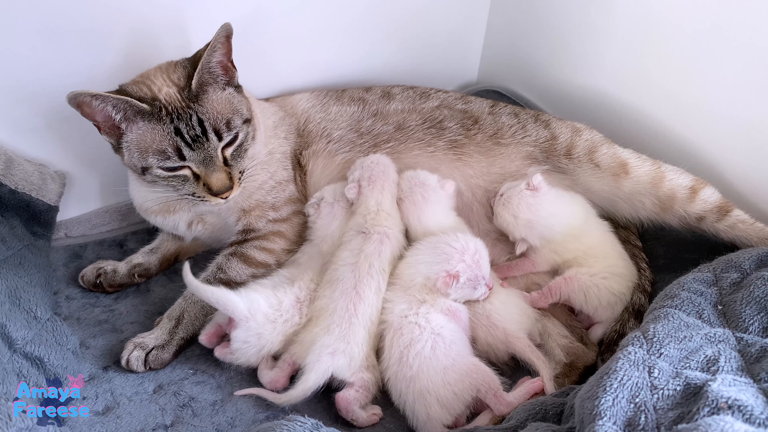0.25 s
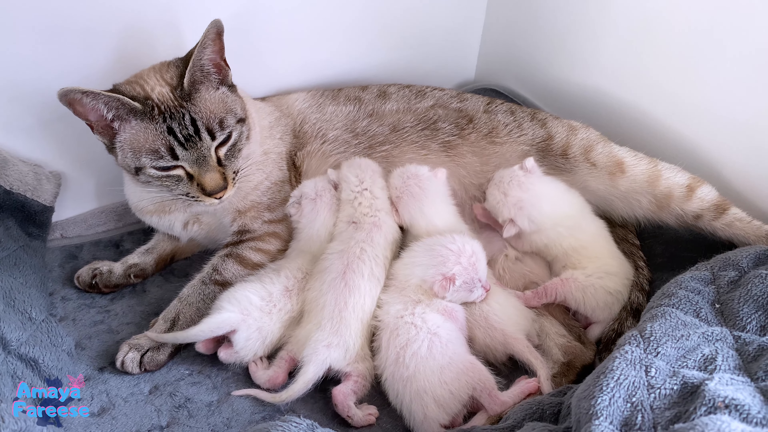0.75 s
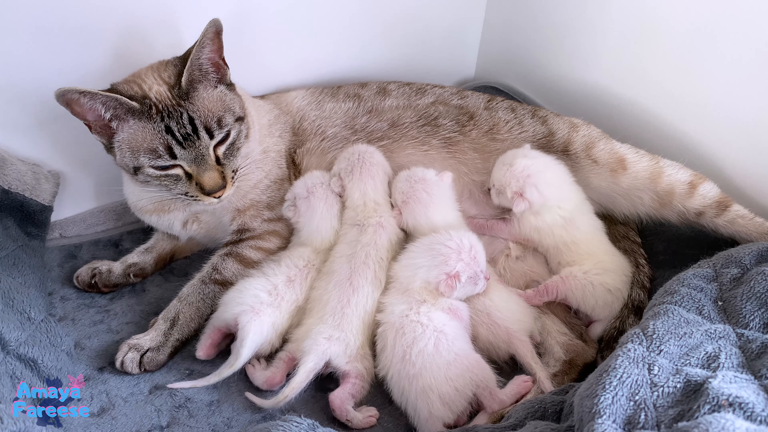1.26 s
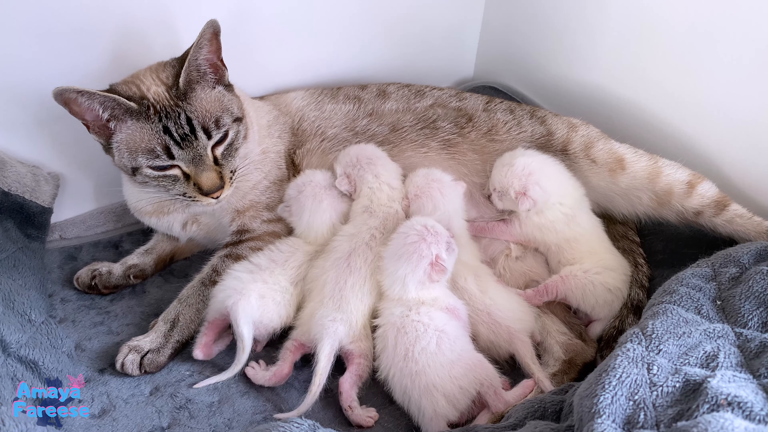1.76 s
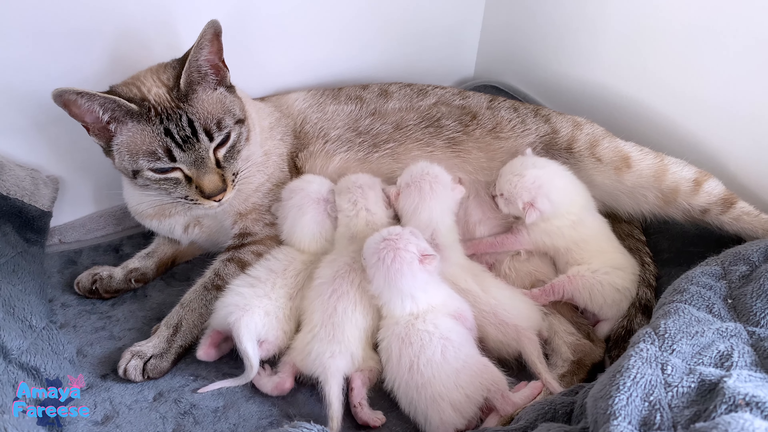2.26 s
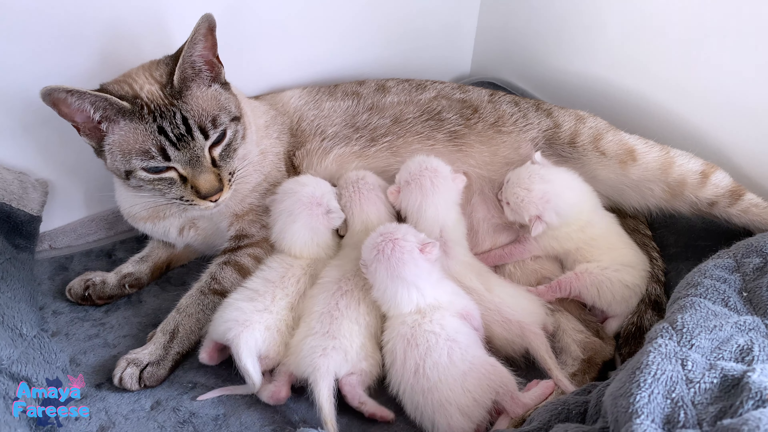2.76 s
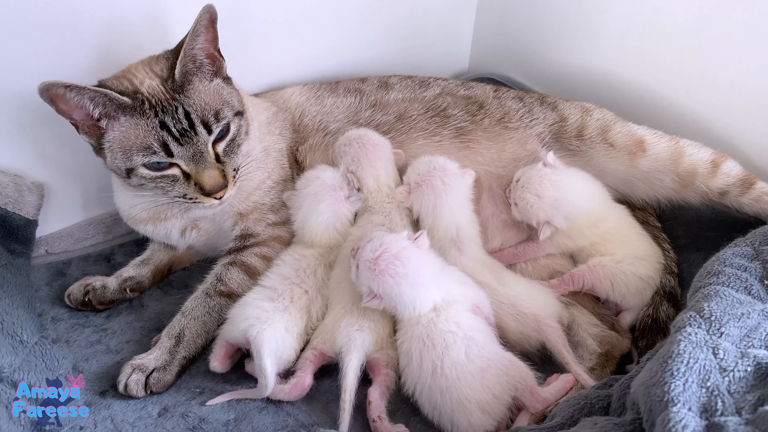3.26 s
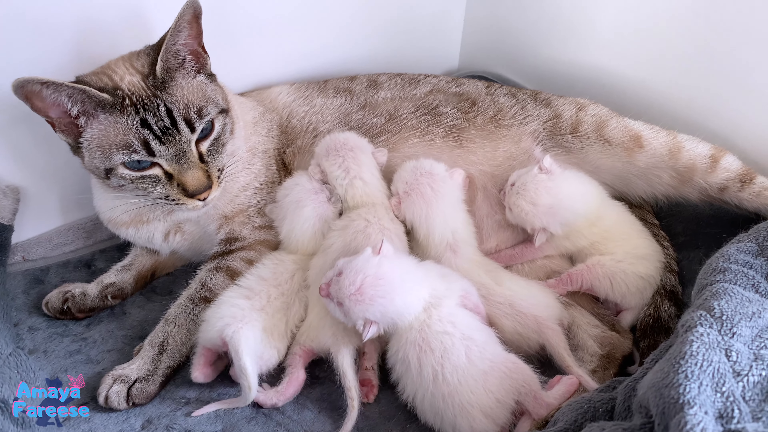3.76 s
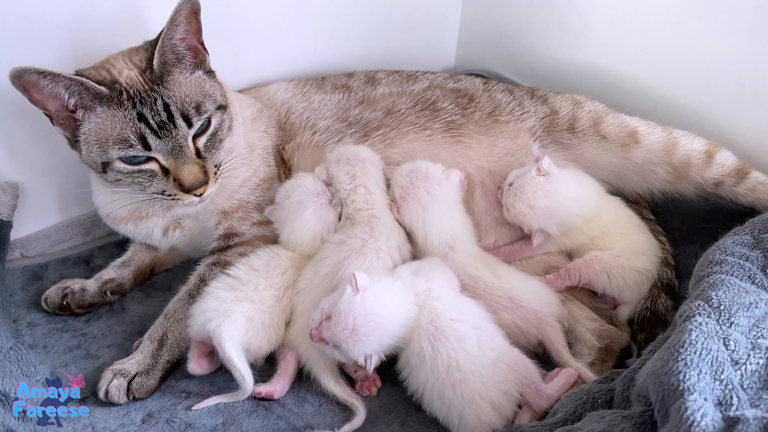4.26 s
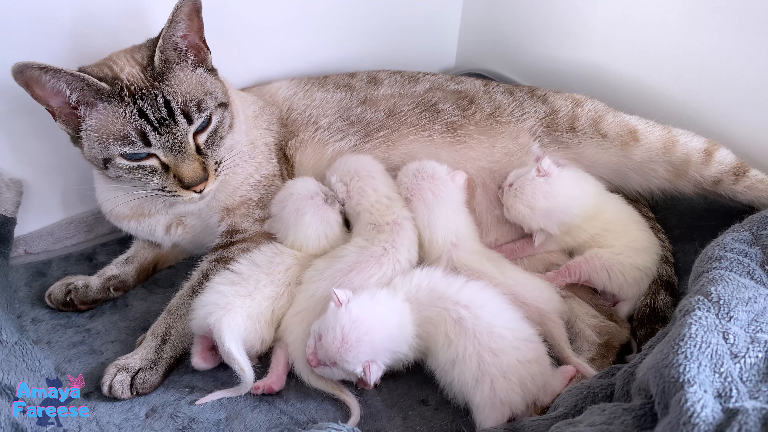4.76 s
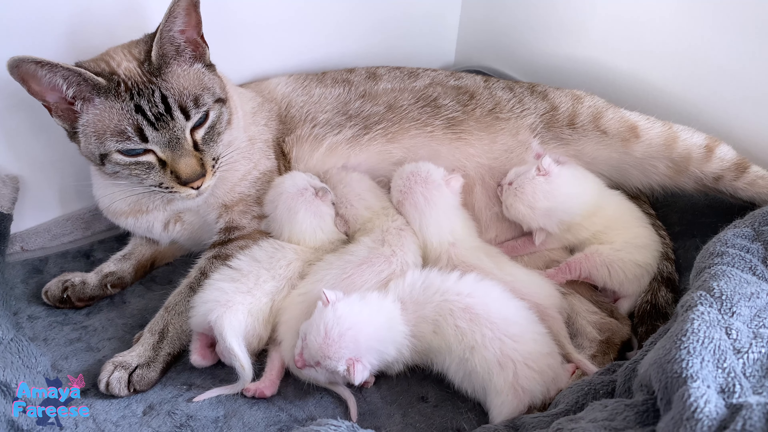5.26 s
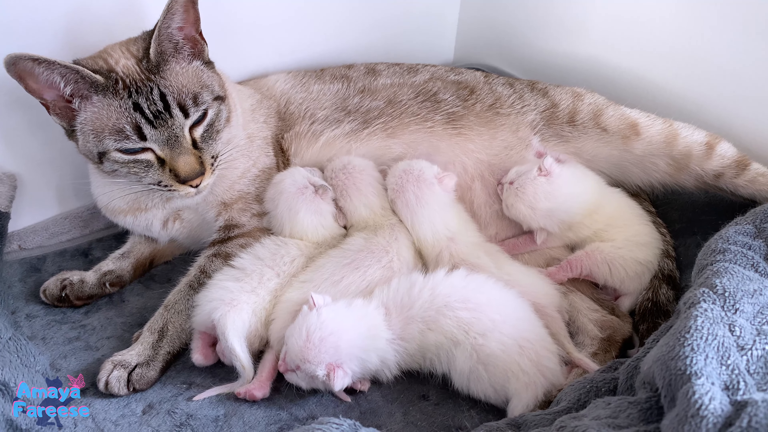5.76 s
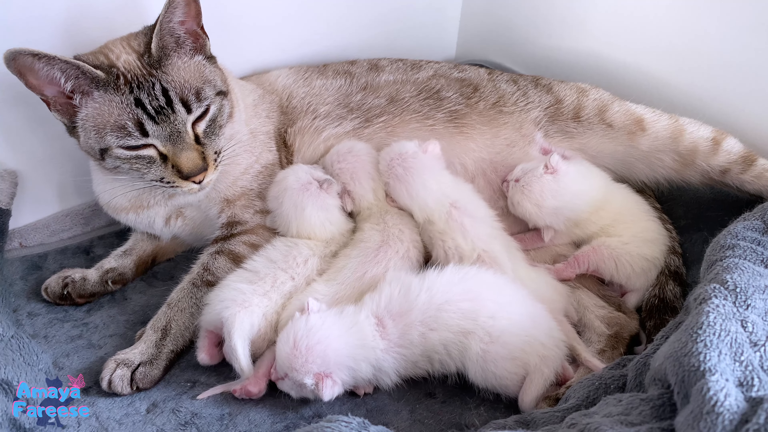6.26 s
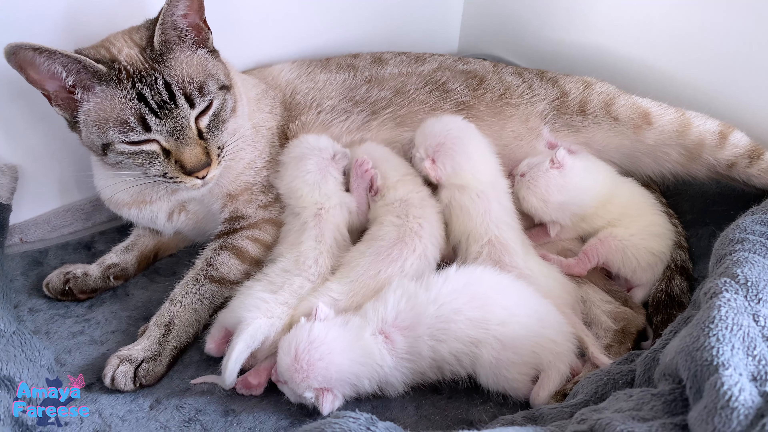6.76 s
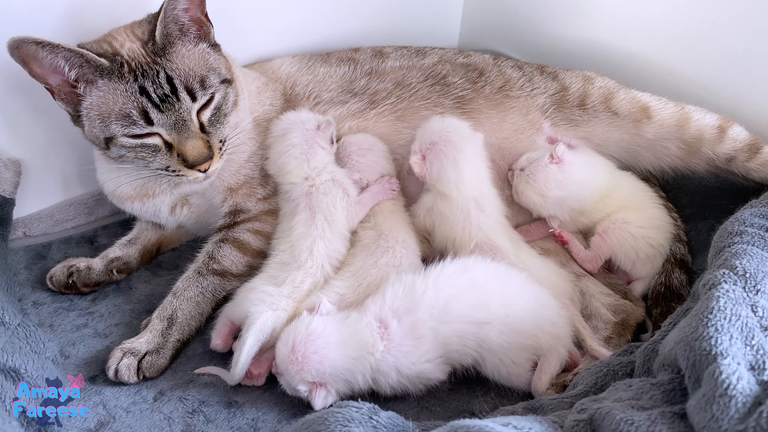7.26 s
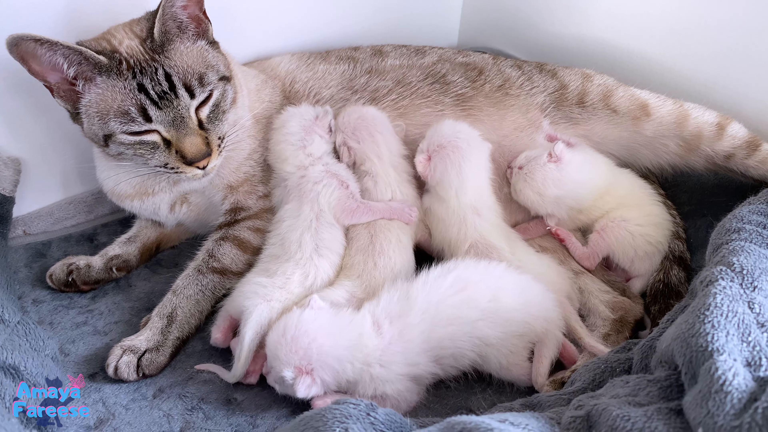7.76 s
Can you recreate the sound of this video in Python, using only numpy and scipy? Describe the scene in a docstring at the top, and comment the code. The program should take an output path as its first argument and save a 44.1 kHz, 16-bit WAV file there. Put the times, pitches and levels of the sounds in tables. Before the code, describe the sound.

Close, deep cat purr in alternating strong and soft strokes, over quiet room hiss, with tiny squeaks, rustling fur and soft suckling smacks.

```python
"""A mother cat purrs close to the microphone while her kittens nurse on a blanket in a quiet room.
From the start her larynx snaps about 24 times a second, ringing her chest: hard going in, softer going out.
Hiss, low rumble and rustling fur lie under it; slides, low flutter at the turn of the purr and thuds join.
Wet noise-burst clicks and tiny squeaks of her wet nose, many in step with the purr, are scattered after.
At 5.57 s band-shaped noise whistles once in her nose, then most of the kittens' ringing smacks follow."""
import sys
import numpy as np
from scipy import signal
from scipy.fft import rfft, irfft
from scipy.io import wavfile
from scipy.ndimage import uniform_filter1d

SR = 44100
rng = np.random.default_rng(int(sys.argv[2]) if len(sys.argv) > 2 else 0)


def dump(signal):
    """Clip the signal to [-1, 1] and save it as 16-bit WAV at the path in sys.argv[1]."""
    limited = np.clip(np.atleast_2d(signal).T, -1, 1)
    pcm = np.round(limited * 32767).astype(np.int16)
    wavfile.write(sys.argv[1], SR, pcm)


N = 353241
SIZE = 8192  # samples in one short sound
HZ = np.fft.rfftfreq(SIZE, 1 / SR)
EDGE_HZ = 16000

# purr strokes: start_s, end_s, level_db, hardness_db (at its peak), hardest_share (of the stroke),
# then rate_hz of the flutter at five evenly spaced moments
INHALES = [(0.5835, 1.324, -31.5, 1.5, 0.31, 23.65, 23.31, 23.51, 24.04, 23.4),
           (2.1381, 2.868, -30.5, 1.3, 0.51, 23.41, 24.28, 24.25, 23.05, 25.23),
           (3.6701, 4.396, -30, 0.6, 0.37, 23.6, 23.57, 23.71, 25.17, 25.15),
           (5.2402, 5.941, -29.5, 2.6, 0.38, 23.41, 22.82, 23.45, 24.48, 24),
           (6.7233, 7.337, -30, 3.1, 0.4, 24.2, 22.9, 23.15, 24.06, 24.1)]
EXHALES = [(-0.0137, 0.479, -36.5, 1.5, 0.25, 25.62, 25.01, 25.44, 26.13, 24.33),
           (1.3447, 2.037, -36, 1.2, 0.63, 25.66, 25.39, 25.13, 25.66, 24.38),
           (2.892, 3.59, -35, 2.7, .45, 24.45, 25.24, 24.39, 25.37, 25.37),
           (4.4152, 5.173, -35.5, 5.7, 0.36, 25.05, 26.56, 25.76, 25.53, 24.18),
           (6.0002, 6.658, -34, 6.9, .5, 24.51, 25.88, 24.7, 24.97, 24.67),
           (7.4017, 7.992, -34, 7.7, 1, 23.77, 24.55, 23.94, 25.2, 25.33)]
# the first snaps of a stroke are weaker and softer, the last die away as the flow turns round
ATTACK_S, ATTACK_DB, ATTACK_SOFT_DB = 0.0069, 3, 3.5
RELEASE_S, RELEASE_DB = 0.029, 7
# moments when snaps rasp more, or less, than their neighbours: middle_s, extra_hardness_db
CATCHES = [(.669, 1), (.755, 4.5), (.882, 4), (.925, 4.5), (.967, 3), (2.43, 3), (2.514, 1.5), (2.681, 4.5),
           (3.925, 3), (3.967, 2.5), (4.053, 2.5), (4.094, 2.5), (4.136, -4), (4.177, 1.5), (5.628, 2.8),
           (5.671, -8), (5.712, 3), (6.895, 4), (7.068, -1.5), (7.109, 2.5), (7.193, 2)]
CATCH_S = 0.015
CATCH_LEVEL_SHARE = 0.3  # such a snap is a little louder or softer too
# shape of the ring of her chest on each stroke: frequency_hz, level_db
CHEST_RING_IN = [(20.0, -84), (50.0, -70), (72.0, -49), (90.0, -6.5), (110.0, -8.5), (132.0, 0),
                 (160.0, -7.5), (195.0, -8.5), (260.0, -19), (480.0, -33.5), (590.0, -45.5),
                 (1200.0, -78.5), (3000.0, -106.5)]
CHEST_RING_OUT = [(20.0, -59.5), (50.0, -62.5), (72.0, -32), (90.0, -4.5), (110.0, -12), (132.0, -6),
                  (160.0, -10.5), (195.0, -17.5), (260.0, -27.5), (400.0, -45.5), (600.0, -56.5),
                  (1200.0, -79), (3000.0, -99.2)]
# shape of the crisp edge of a snap, throat narrow and throat open: frequency_hz, level_db
THROAT_NARROW = [(60, -52.5), (250, -1.5), (400, 0.5), (480, 8), (545, 9.5), (610, -16), (700, -2),
                 (780, -7.5), (950, -7.5), (1200, -20.5), (1600, -24), (2000, -31), (4000, -57),
                 (12000, -97.5)]
THROAT_OPEN = [(60, -50.5), (250, -7.5), (400, 0), (490, 1.5), (560, -4), (650, 6), (850, -2.5),
               (1150, -15), (1450, -21.5), (1900, -33), (4000, -54), (12000, -90.5)]
# her throat relaxes after the second breath in and muffles the last: time_s, open_share, upper_rasp_db
THROAT_OPENING = [(1.3, 0.058, -1.5), (2.1, 0.05, 1), (2.9, 0.05, 7), (3.6, 0.94, 1), (5.9, 1, -3),
                  (6.7, 1, -4.5)]
# the left port faces her throat: frequency_hz, left_minus_right_db
FACING = [(130, 2), (250, 2.5), (370, 3.5), (520, 10), (680, 7), (1000, 10.5), (2000, 2)]
# loose tissue flapping in the throat: frequency_hz, level_db
GURGLE_COLOUR = [(100, -26.5), (190, 1), (330, 2.5), (470, -2.5), (600, -20), (1500, -44.5), (5000, -73)]
GURGLE_S = 0.011
# decay time of the room, to -60 dB: frequency_hz, t60_s
ROOM_T60 = [(100, 0.89), (400, 0.49), (1500, 0.037), (8000, 0.13)]
# shapes of the quiet hiss of the room and of the low rumble: frequency_hz, level_db
AIR_COLOUR = [(410, -26), (700, 0), (841, -1.5), (2020, -7.5), (2200, -7.5), (2350, -5.5), (2550, -10.5),
              (2800, -7.5), (3070, -11), (4990, -9.5), (5470, -12), (6650, -11), (9230, -23),
              (10500, -19.5), (11700, -24), (12300, -33), (13300, -45.5), (16000, -44)]
RUMBLE_COLOUR = [(15, -40), (30, -16.5), (45, -3), (65, 2), (100, -11), (200, -1.5), (400, -23.5),
                 (700, -34.5), (1200, -50), (3000, -66.5)]
# fur brushes past fur: middle_s, length_s, level_db (before the trim in fur)
BRUSHES = [(.21, 0.27, -80), (.77, 0.17, -78), (1.2, 0.22, -91), (1.44, 0.092, -84), (2.3, 0.22, -82),
           (3.07, 0.4, -77), (3.47, 0.66, -76.5), (3.93, 0.67, -80), (4.59, 0.3, -79.5), (4.92, 0.29, -79),
           (5.51, .26, -78), (5.88, 0.24, -80), (6.36, 0.66, -85), (6.66, 0.2, -79), (7.18, 0.26, -83),
           (7.43, .16, -81), (7.66, 0.58, -80), (7.96, .25, -79)]
FUR_REST_DB = -84  # the litter is never quite still
# shape of the rustle: frequency_hz, level_db
FUR_COLOUR = [(600, -14), (2000, -7.5), (2900, -0.5), (4000, -19), (7000, 5), (8300, 8), (9500, 0),
              (12000, -1), (13000, -13), (16000, -17.5)]
# kittens slide over the blanket: middle_s, length_s, level_db
SLIDES = [(.23, .2, -71), (.41, .14, -72), (1.8, 0.15, -69), (5.57, 0.68, -64), (5.9, 0.14, -74),
          (6.4, 0.61, -82)]
# low, dull flutter of the purr as the flow turns, and a few soft thuds: start_s, peak_db, pitch_hz
LOW_PULSES = [(0.457, -30, 81), (0.462, -48, 52), (0.497, -35, 77), (0.518, -32.5, 72), (.545, -49, 70),
              (.795, -42, 50), (6.219, -48, 57)]
# the larynx stutters weakly while the flow turns round: start_s, end_s, level_db
TURNS = [(.49, .57, -48.5), (2.05, 2.11, -43.5), (2.87, 2.885, -72), (3.6, 3.64, -53), (5.175, 5.21, -49),
         (5.95, 5.99, -47.5), (6.66, 6.71, -46.5), (7.36, 7.39, -46)]
STUTTER_S = 0.028  # typical gap between these weak snaps
# wet mouth clicks: start_s, level_db (before the trim in clicks), treble_db (before tilt_share),
# left_minus_right_db, top_edge_hz, decay_s
CLICKS = [(1.4344, -58, -2, 3, 12000, .003), (3.667, -38.5, 1, -1, 13600, 0.0026),
          (3.683, -42.5, 0, -4, 14000, .003), (4.6034, -52, 19, -4, 9000, 0.0043),
          (6.3987, -46, 15, -4, 7960, .0035), (6.58, -42, 1, -1, 6540, 0.0027),
          (7.2168, -43.5, -4, -5, 9000, 0.0032), (7.4126, -54, 7, 0, 8000, .0035),
          (7.639, -35, 2.5, -4, 13000, .0025), (7.641, -34, 8, 4, 6500, 0.0025),
          (7.648, -31, 9, -4, 16000, .0016), (7.652, -35, -2, -1, 16000, 0.0014),
          (7.6583, -34, 2, 3, 16000, 0.0015), (7.6745, -30, 11, -1, 16000, .0016),
          (7.919, -44, 1, 3, 12000, 0.0026)]
# shape of a click before its tilt and top edge: frequency_hz, level_db
CLICK_COLOUR = [(150, -36), (450, -21), (900, -1), (1600, 2), (2500, 5), (3800, -4.5), (5200, -0.5),
                (7800, -2), (9500, -7.5), (11500, -6), (13000, -9), (15000, 4)]
# tiny squeaks of the mother's wet nose, many in step with her purr:
# start_s, level_db (before the trim in squeaks), pitch_hz
SQUEAKS = [(3.1243, -62, 2780), (3.6677, -63, 2750), (3.677, -61, 2750), (3.687, -57.5, 2830),
           (4.753, -61.5, 2900), (5.43, -60.5, 3020), (6.032, -66, 2850), (6.0711, -62.5, 2840),
           (6.1095, -59.5, 2830), (6.15, -66, 2820), (6.1878, -56.5, 2830), (6.2692, -59.5, 2900),
           (6.308, -68, 2900), (6.5375, -66, 2900), (7.6395, -56, 2780), (7.68, -59, 2820)]
# air whistles through her nose at the crest of the loudest inhale: middle_s, length_s, level_db
WHISTLES = [(5.572, 0.09, -64)]
# shape of that whistle: frequency_hz, level_db
WHISTLE_COLOUR = [(1000, -43), (1450, -18), (1545, 8), (1640, -20), (1900, -26), (2030, -13), (2150, -22),
                  (2400, -14), (2700, -35), (6000, -60)]
# soft smacks of suckling: start_s, level_db (before the trim in smacks), pitch_hz, ring_t60_s
SMACKS = [(3.668, -55.5, 1100, .02), (5.852, -54, 565, .025), (5.887, -53, 610, .025),
          (5.907, -46.5, 640, .035), (6.002, -56, 740, .025), (6.133, -58, 695, .025),
          (6.267, -54, 672, .025), (6.336, -48.5, 655, .045), (6.507, -57, 589, .025),
          (6.5375, -48, 620, 0.033), (6.602, -47, 524, .03), (6.663, -59, 703, .025)]


def amp(db):
    """Decibels to gain."""
    return 10 ** (np.asarray(db) / 20)


def evened(x):
    """Scales to an rms of one."""
    return x / np.sqrt(np.mean(x ** 2) + 1e-24)


def read(points, hz):
    """Reads a spectrum on a log-frequency axis."""
    f, value = np.transpose(points)
    return np.interp(np.log(hz + 1), np.log(f + 1), value)


def add(mix, s, sound):
    """Mixes a sound in at time s, trimming whatever falls outside."""
    at = round(s * SR)
    sound = sound[..., max(-at, 0):]
    part = mix[..., max(at, 0):][..., :sound.shape[-1]]
    part += sound[..., :part.shape[-1]]


def canvas():
    """An empty stereo mix and the time axis of one short sound."""
    return np.zeros((2, N)), np.arange(SIZE) / SR


def pan(left_db):
    """Left and right gains for a level difference."""
    return amp(np.array([[left_db], [-left_db]]) / 2)


def noise(colour, size, channels=2):
    """Independent channels of noise with a given spectrum, at an overall rms of one."""
    white = rfft(rng.standard_normal((channels, size)))
    gain = amp(read(colour, np.fft.rfftfreq(size, 1 / SR)))
    return evened(irfft(white * gain, size))


def swells(moves):
    """Gain over time of movements that each swell and fade smoothly."""
    level = np.zeros(N)
    for middle, length, db in moves:
        add(level, middle - length / 2, amp(db) * signal.windows.hann(int(length * SR)))
    return level


def causal(db):
    """Frequency response with this gain that rings only after it is struck."""
    mirrored = np.r_[db, db[-2:0:-1]]
    log_gain = np.log(amp(np.maximum(mirrored, -110)))
    return np.exp(np.conj(signal.hilbert(log_gain)))[:len(db)]


def ripple(count=30):
    """Random smooth unevenness of a spectrum, with a spread near one."""
    return read(np.c_[np.geomspace(40, 4000, count), rng.standard_normal(count)], HZ)


def effort(at, stroke, crest, arch_db, soften_db):
    """Level and hardness (dB) of a snap: each bends over the stroke, the level about the share `crest`."""
    start, end, level_db, hard_db, hardest = stroke[:5]
    share = (at - start) / (end - start)
    starting = np.exp((start - at) / ATTACK_S)
    ending = np.exp((at - end) / RELEASE_S)
    catch_db = sum(db * np.exp(-((at - s) / CATCH_S) ** 2) for s, db in CATCHES)

    level_db = level_db + CATCH_LEVEL_SHARE * catch_db - arch_db * (2 * (share - crest)) ** 2
    level_db = level_db - ATTACK_DB * starting - RELEASE_DB * ending
    hard_db = hard_db + catch_db - ATTACK_SOFT_DB * starting - soften_db * (2 * (share - hardest)) ** 2
    return level_db, hard_db


def snaps(strokes, **shape):
    """The larynx snaps each time its flutter completes a cycle; rows (time_s, level_db, hardness_db)."""
    rows = []
    for stroke in strokes:
        start, end, _, _, _, *rates = stroke
        t = np.arange(start, end, 1 / SR)
        rate_hz = np.interp(t, np.linspace(start, end, len(rates)), rates)
        turns = np.cumsum(rate_hz) / SR
        at = np.interp(np.arange(int(turns[-1]) + 1), turns, t)
        rows.extend(zip(at, *effort(at, stroke, **shape)))
    return rows


def struck(colour_db, spread_hz, right_lag_s, cycle_s=0.03, order=3):
    """The ring of one snap at both ports; the lows come late, so each thump falls in pitch."""
    late_lows = ((spread_hz - 1j * HZ) / (spread_hz + 1j * HZ)) ** order
    response = causal(colour_db) * late_lows
    lean = amp(read(FACING, HZ) / 2)
    lag = np.exp(-2j * np.pi * HZ * right_lag_s)
    ring = irfft([response * lean, response / lean * lag])
    # before the lean, an rms of one if spread over one cycle
    return ring * np.sqrt(cycle_s * SR / np.sum(irfft(response) ** 2))


def purr(cycles, chest, spread_hz, delay_s, snap_share, jitter_s, uneven_db, fickle_db, ripple_db, tick_db,
         tick_share, reopen_s, reopen_jitter_s, reopen_db, retick_db, puff_db):
    """Each cycle the folds snap (thump and tick), part again with a softer thump and let a puff through."""
    out, t = canvas()
    edge = read([(170, 0.051), (480, 1.05)], HZ)  # a harder snap lifts the upper part of the ring
    rasp = read([(480, 0.4), (900, 0.94)], HZ)  # and brightens the tick
    upper = read([(700, 0), (1100, 1)], HZ)
    puff_colour = [(150, -18.5), (420, 0.5), (580, -6.5), (900, -18.5), (1400, -15.0), (2200, -30.0),
                   (5000, -42.5)]
    moments, openings, rasps_db = np.transpose(THROAT_OPENING)
    for at, level_db, hard_db in cycles:
        late, strong, sharp, again, when = rng.standard_normal(5)
        size = amp(level_db + uneven_db * strong)
        hard_db = hard_db + fickle_db * sharp

        chest_db = read(chest, HZ) + snap_share * hard_db * edge + ripple_db * ripple()
        thump = struck(chest_db, spread_hz, right_lag_s=0.00044)

        opened = np.clip(np.interp(at, moments, openings), 0, 1)
        throat_db = (1 - opened) * read(THROAT_NARROW, HZ) + opened * read(THROAT_OPEN, HZ)
        throat_db = throat_db + np.interp(at, moments, rasps_db) * upper
        tick = struck(throat_db + 2.9 * ripple(), spread_hz, right_lag_s=0.00071)
        tick = irfft(rfft(tick) * causal(tick_db + tick_share * hard_db * rasp))

        puff = noise(puff_colour, SIZE) * np.exp(-t / 0.024) * (1 - np.exp(-t / 0.00073))
        puff = puff * amp(puff_db + 0.55 * hard_db)

        at += delay_s + jitter_s * late
        add(out, at, size * (thump + tick + puff * pan(3.3)))
        # the second tick is softer going in, louder going out
        parting = amp(reopen_db + 2.2 * again) * thump + amp(retick_db + 3.7 * again) * tick
        add(out, at + reopen_s + reopen_jitter_s * when, size * parting)
    return out


def gurgle(cycles, gain_db=-21.0, uneven_db=2, lead_s=0.00395, scatter_s=0.002):
    """On the way out the slack throat flaps roughly around each snap: a short burst of noise."""
    out, window = np.zeros((2, N)), signal.windows.hann(int(GURGLE_S * SR))
    for at, level_db, _ in cycles:
        when, strong = rng.standard_normal(2)
        flap = noise(GURGLE_COLOUR, SIZE, channels=1)[:, :len(window)] * window
        gain = amp(level_db + gain_db + uneven_db * strong)
        add(out, at - lead_s + scatter_s * when, gain * pan(4.1) * flap)
    return out


def room(x, wet):
    """Adds a short, soft tail from the nearby walls: decaying noise, different at each port."""
    hz, t, z = signal.stft(rng.standard_normal((2, SIZE * 2)), SR, nperseg=256)
    decay = amp(-60 * t / read(ROOM_T60, hz)[:, None])
    tail = signal.istft(z * decay, SR, nperseg=256)[1][:, :SIZE]
    tail[:, :SR // 250] = 0  # nothing returns in the first 4 ms
    tail = irfft(rfft(tail / np.linalg.norm(tail[0])) * causal(read(wet, HZ)))
    return x + signal.fftconvolve(x, tail, axes=1)[:, :N]


def floor(hiss_db=-68, rumble_db=-53, apart_db=-5):
    """Steady hiss, different at each port, over a low rumble that is mostly shared."""
    hiss = amp(hiss_db) * noise(AIR_COLOUR, N) * pan(0.83)
    rumble = noise(RUMBLE_COLOUR, N, channels=1) + amp(apart_db) * noise(RUMBLE_COLOUR, N)
    return hiss + amp(rumble_db) * rumble


def fur(gain_db=-1.0, grain_db=2):
    """Fur brushes fur and blanket in fine grains: noise with a quickly wavering level."""
    level = amp(FUR_REST_DB) + amp(gain_db) * swells(BRUSHES)
    grains = evened(uniform_filter1d(rng.standard_normal(N), size=100))
    return level * amp(grain_db * grains) * noise(FUR_COLOUR, N) * pan(-2.6)


def slides():
    """A kitten's body drags over the cloth with a dull brush of noise."""
    colour = [(200, -7), (800, 4.5), (1500, -2.0), (2500, -5.0), (3300, -13.0), (5000, -9.0), (10000, -41)]
    return swells(SLIDES) * noise(colour, N) * pan(3.4)


def low_pulses(rise_s=0.012):
    """Low, dull flutter of the purr as the flow turns, and a few soft thuds: brief sine pulses."""
    out, t = canvas()
    pulse = (t / rise_s * np.exp(1 - t / rise_s)) ** 2
    for s, db, hz in LOW_PULSES:
        add(out, s, amp(db) * pan(1.5) * np.sin(2 * np.pi * hz * t) * pulse)
    return out


def stutters():
    """Weak, irregular snaps as the flow turns round; rows (time_s, level_db, hardness_db)."""
    rows = []
    for start, end, db in TURNS:
        gaps = STUTTER_S * rng.uniform(0.77, 1.3, size=6)
        times = start + np.cumsum(gaps) - gaps[0]
        rows.extend((at, db, 0) for at in times if at < end)
    return rows


def clicks(gain_db=-7, rise_s=0.00053, tilt_share=0.72, steep_db=40):
    """Wet lips part with a tiny crack: a noise burst, tilted and cut off by steep_db an octave."""
    out, t = canvas()
    for s, db, treble_db, left_db, top_hz, decay_s in CLICKS:
        colour = []
        for f, d in CLICK_COLOUR:
            tilt_db = tilt_share * treble_db * np.log(f / 4000)
            cut_db = steep_db * max(np.log2(f / top_hz), 0)
            colour.append((f, d + tilt_db - cut_db))
        burst = noise(colour, SIZE) * (1 - np.exp(-t / rise_s)) * np.exp(-t / decay_s)
        add(out, s, amp(db + gain_db) * pan(left_db) * burst)
    return out


def faint_squeaks(start, end, db, hz, count):
    """Many faint squeaks at chance moments, as rows (start_s, level_db, pitch_hz)."""
    when, size, pitch = rng.random((count, 3)).T
    return np.c_[start + (end - start) * when, db - 8 * size, hz * (0.92 + 0.16 * pitch)]


def squeaks(gain_db=-3, rise_s=0.0015, fall=0.036, rough=0.6, flutter_hz=400):
    """A tiny gap in her wet nose whistles, roughened by noise and sagging in pitch as it opens."""
    out, t = canvas()
    flutter_colour = [(flutter_hz / 2, 0), (flutter_hz, -6), (flutter_hz * 4, -40), (flutter_hz * 10, -80)]
    swell = t / rise_s * np.exp(1 - t / rise_s)
    for s, db, hz in np.r_[SQUEAKS, faint_squeaks(2.5, 8, db=-70, hz=2850, count=30)]:
        pitch_hz = hz * (1 + fall * (np.exp(-t / (2 * rise_s)) - 0.5))
        turn = np.exp(2j * np.pi * np.cumsum(pitch_hz) / SR)
        flutter = noise(flutter_colour, SIZE)
        add(out, s, amp(db + gain_db) * (turn.imag + rough * flutter * turn.real) * swell)
    return out


def smacks(gain_db=2.0, rise_s=0.0005, puff_db=-6, puff_s=0.012):
    """Lips let go of the teat: the hollow of the mouth rings briefly, with a little puff."""
    out, t = canvas()
    for s, db, hz, t60 in SMACKS:
        ring = np.sin(2 * np.pi * hz * t) * np.exp(-np.log(1000) * t / t60)
        colour = [(hz / 8, -20), (hz * 0.7, -2), (hz * 1.1, 0), (hz * 0.87, -13), (hz * 12, -45)]
        puff = amp(puff_db) * noise(colour, SIZE) * np.exp(-t / puff_s)
        add(out, s, amp(db + gain_db) * pan(2) * (ring + puff) * (1 - np.exp(-t / rise_s)))
    return out


def whistle():
    """A thin, breathy whistle of the nose: noise with a narrow peak."""
    return swells(WHISTLES) * noise(WHISTLE_COLOUR, N) * pan(3)


def scene():
    """The mother's two-stroke purr and wet nose, the nursing kittens and the room."""
    breaths_in = snaps(INHALES, crest=0.52, arch_db=4.5, soften_db=5.5)
    breaths_out = snaps(EXHALES, crest=0.33, arch_db=-0.44, soften_db=2.5)
    inward = purr(breaths_in, CHEST_RING_IN, spread_hz=360, delay_s=-0.0009, snap_share=0.71,
                  jitter_s=0.00042, uneven_db=0.5, fickle_db=1.4, ripple_db=1.43,
                  tick_db=-30.3, tick_share=1.77, reopen_s=0.015, reopen_jitter_s=0.0008,
                  reopen_db=-17.5, retick_db=-9, puff_db=-33.0)
    outward = purr(breaths_out + stutters(), CHEST_RING_OUT, spread_hz=650, delay_s=-0.00061, snap_share=0.41,
                   jitter_s=0.00038, uneven_db=0.5, fickle_db=-2.0, ripple_db=1.7,
                   tick_db=-39.5, tick_share=0.36, reopen_s=0.0152, reopen_jitter_s=0.00054,
                   reopen_db=-7.5, retick_db=2, puff_db=-33)
    breathing = inward + outward + gurgle(breaths_out) + whistle()
    breathing = room(breathing, wet=[(100, -27.5), (220, -19.5), (450, -11.5), (1000, -18.0)])
    wet_sounds = room(clicks() + squeaks(), wet=[(500, -1), (8000, -5.5)])
    return breathing + wet_sounds + smacks() + low_pulses() + slides() + fur() + floor()


def record(dry):
    """The recorder's band limit: a steep low-pass at EDGE_HZ."""
    lowpass = signal.firwin(511, EDGE_HZ, window=("kaiser", 9), fs=SR)
    return signal.oaconvolve(dry, lowpass[None], "same")


dry = scene()
out = record(dry)
dump(out)
```